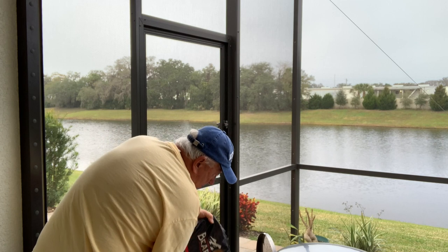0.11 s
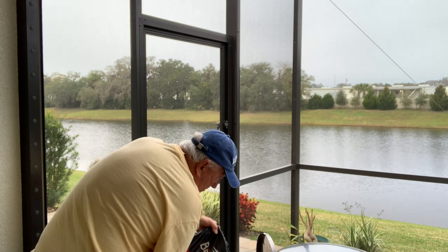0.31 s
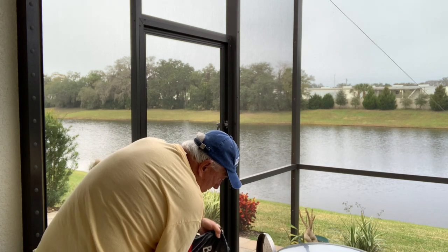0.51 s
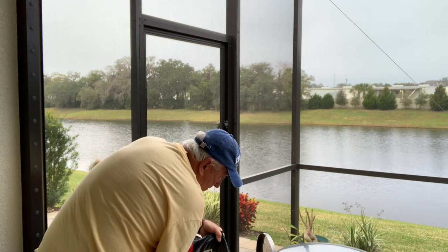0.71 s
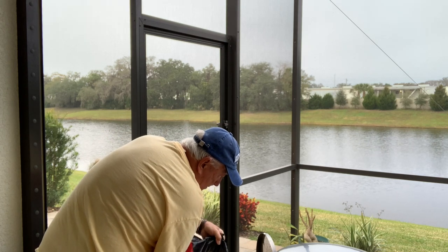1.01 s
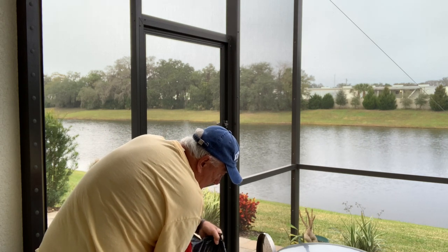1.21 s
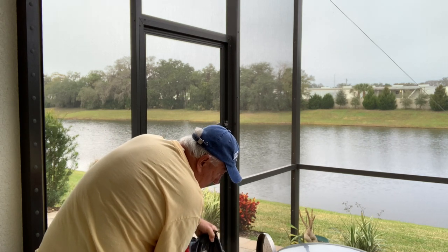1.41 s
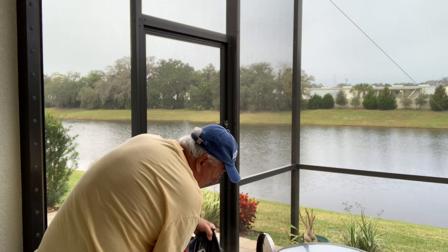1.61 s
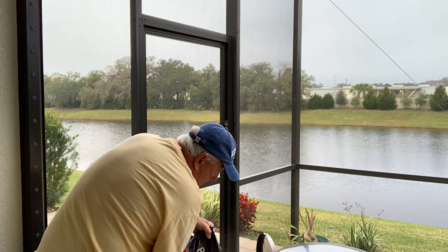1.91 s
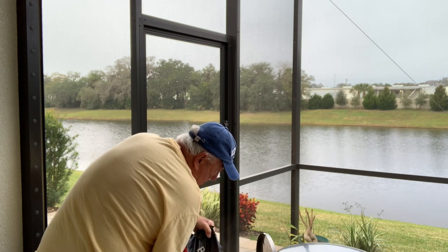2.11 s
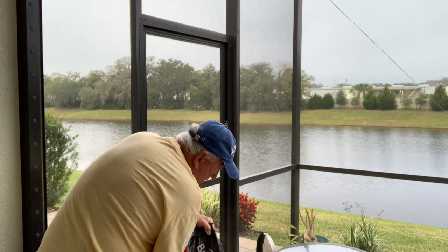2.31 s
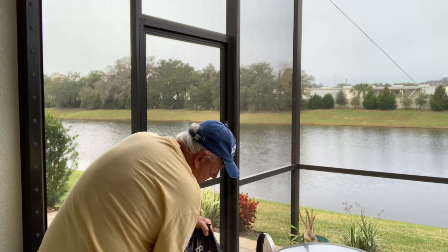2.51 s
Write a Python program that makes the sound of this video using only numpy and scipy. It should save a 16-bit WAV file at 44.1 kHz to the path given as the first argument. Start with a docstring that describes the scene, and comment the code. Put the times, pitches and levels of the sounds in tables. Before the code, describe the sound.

Wood pellets pour into a steel grill hopper, first pinging on bare metal, swelling to a bright dense clatter, then dulling and thinning while the plastic bag crinkles sharply; close stereo microphone on a screened porch, faint outdoor rumble.

```python
"""Wood pellets pour from a plastic bag into the steel hopper of a grill, on a screened porch.
The first ones ping on bare metal, the stream swells and rings the walls, then dulls to a low drumming.
The flow thins to a trickle, the bag crinkles and is bumped, and a last handful slides out.
Random impacts drive coloured filters and steel resonances; snaps and bumps are bursts of impacts;
decaying noise tails make the porch, and coloured noise the outdoor rumble."""
import sys
import numpy as np
from scipy import signal
from scipy.fft import rfft, irfft, next_fast_len
from scipy.io import wavfile
from scipy.ndimage import map_coordinates

SR = 44100
rng = np.random.default_rng(int(sys.argv[2]) if len(sys.argv) > 2 else 0)


def wav_record(signal):
    """Record a signal, one row per channel, as 16-bit PCM in the file named by sys.argv[1]."""
    frames = np.transpose(np.atleast_2d(signal))
    bounded = np.clip(frames, -1, 1)
    # unit amplitude maps onto the largest positive 16-bit level
    quanta = np.round(bounded * 32767).astype(np.int16)
    wavfile.write(sys.argv[1], SR, quanta)


N = 119070

PELLET_SPREAD_DB = 4.5  # mean of the exponential spread of impact size, before its cap
CLUMP_T60_S = .1


def amp(db):
    """Decibels to gain."""
    return 10 ** (np.asarray(db) / 20)


def unit(x):
    """Scale to rms 1."""
    return x / np.sqrt(np.mean(x ** 2) + 1e-20)


def along(points, hz):
    """Read (Hz, value) points on a log frequency axis."""
    f, v = np.transpose(points)
    return np.interp(np.log(hz + 1), np.log(f + 1), v)


def curves(rows):
    """One value per sample for each column after the time."""
    s, *cols = np.transpose(rows)
    return [np.interp(np.arange(N) / SR, s, c) for c in cols]


def wobble(rate):
    """A smooth random curve, rate knots a second."""
    knots = rng.standard_normal(N // 20)
    return map_coordinates(knots, [np.arange(N) * rate / SR], mode="mirror")


def filtered(x, response):
    """Apply a complex response of frequency to x."""
    size = 2 * next_fast_len(N * 2 // 3)
    spectrum = rfft(x, size) * response(np.fft.rfftfreq(size, 1 / SR))
    return irfft(spectrum, size)[..., :N]


def coloured(x, points):
    """A causal filter through (Hz, dB) points that keeps the power of white input."""
    def response(hz):
        # folding the cepstrum makes the response minimum phase
        cepstrum = irfft(np.log(unit(amp(along(points, hz)))))
        half = len(cepstrum) // 2
        return np.exp(rfft(np.r_[cepstrum[:1], 2 * cepstrum[1:half], np.zeros(half)]))
    return filtered(x, response)


def rung(x, modes):
    """Resonances of alternating sign that together keep the power of white input."""
    def response(f):
        h = 0
        for k, (centre_hz, width_hz, db) in enumerate(modes):
            damping = 1j * f * width_hz
            h = h + (-1) ** k * amp(db) * damping / (centre_hz ** 2 - f * f + damping)
        return h / np.sqrt(np.mean(abs(h) ** 2))
    return filtered(x, response)


def gliding(x, hz, width_hz):
    """A resonance whose centre moves; keeps the power of white input."""
    turn = np.exp(2j * np.pi * np.cumsum(hz) / SR)
    pole = np.exp(-np.pi * width_hz / SR)
    gain = np.sqrt(2 * (1 - pole ** 2))
    return np.real(turn * signal.lfilter([gain], [1, -pole], x / turn))


def impacts(rate, spread_db):
    """Random tiny impacts of rms 1: many weak, a few strong."""
    chance = rate / SR
    size = amp(spread_db * np.minimum(rng.exponential(size=N), 4))
    struck = rng.random(N) < chance
    sign = np.sign(rng.standard_normal(N))
    # weaker where denser: the rate changes the grain, not the level
    return unit(struck * sign * size / np.sqrt(chance))


def bursts(rows, t60_s):
    """Envelope of events that rise fast and die away, summed in power."""
    attack_s = .0012
    t = np.arange(N) / SR
    power = np.zeros(N)
    for s, db in rows:
        age = np.maximum(t - s, 0)
        power += (amp(db - 60 * age / t60_s) * (1 - np.exp(-age / attack_s))) ** 2
    return np.sqrt(power)


def outdoors():
    """A low distant rumble of coloured noise, nearly the same in both channels."""
    # rumble colour: (frequency [Hz], relative level [dB])
    rumble_colour = [(20, -27), (60, -3.5), (115, 2), (170, -5), (350, -3.5), (2000, -13), (4000, -24.5),
                     (15000, -68)]
    level_db, side_db = -35.5, -10.5  # side relative to mid
    mid, side = coloured(rng.standard_normal((2, N)), rumble_colour)
    side = side * amp(side_db)
    return amp(level_db) * np.array([mid + side, mid - side])


def diffuse(channels=3):
    """Unrelated noise tails of energy 1 whose decay time varies with frequency."""
    # porch decay: (frequency [Hz], T60 [s])
    porch_t60 = [(250, .08), (2000, .26), (11000, .5)]
    hz, t, z = signal.stft(rng.standard_normal((channels, SR // 3)), SR, nperseg=256)
    fade = amp(-60 * t / along(porch_t60, hz)[:, None])
    fade = fade / np.linalg.norm(fade, axis=1, keepdims=True)  # equal energy in every band
    tail = signal.istft(z * fade, SR, nperseg=256)[1]
    return tail / np.linalg.norm(tail, axis=1, keepdims=True)


def porch(x, count=14):
    """Shared sound, its channel phase varying with frequency, plus unrelated tails that crossfade."""
    # stereo spread, narrow near 9 kHz and at the top:
    # (frequency [Hz], unrelated over shared sound [dB])
    stereo_spread = [(100, -10), (380, -9), (750, 4), (1700, 0), (7100, 2), (8400, -28), (9700, -28),
                     (10700, -5), (12200, -5), (13000, -32)]
    # phase between the channels, opposed near 9 kHz, equal at the top:
    # (frequency [Hz], phase [rad])
    channel_phase = [(100, 0), (1500, .3), (2600, 1.2), (4000, 1.2), (5700, 2.9), (6900, 4), (7600, 3.8),
                     (8300, np.pi), (10000, np.pi), (11700, 1.4), (12900, 0)]
    shared_tail_db = -6  # echo common to both channels, over the dry sound

    place = np.linspace(0, count - 1, N)
    echo = 0
    for k in range(count):
        share = np.sqrt(np.maximum(1 - abs(place - k), 0))
        echo = echo + signal.oaconvolve((x * share)[None], diffuse(), axes=1)[:, :N]
    shared = (x + amp(shared_tail_db) * echo[0]) / np.hypot(1, amp(shared_tail_db))

    def shared_response(f):
        turn = np.exp(.5j * np.array([[-1], [1]]) * along(channel_phase, f))
        return turn / np.hypot(1, amp(along(stereo_spread, f)))

    def unrelated_response(f):
        ratio = amp(along(stereo_spread, f))
        return ratio / np.hypot(1, ratio)

    return filtered(shared, shared_response) + filtered(echo[1:], unrelated_response)


def bag():
    """Creases snap in short flurries; now and then the bag bumps the rim."""
    # crinkles: (time [s], level [dB])
    crinkles = [(.15, -27.5), (1.222, -8.5), (1.411, -13.5), (1.735, -13.5), (1.821, -15), (1.829, -10),
                (1.86, -30), (1.909, -16), (1.95, -22), (2.119, -19), (2.142, -15), (2.338, -19),
                (2.632, -22.5), (2.688, -11)]
    # dull bumps on the rim: (time [s], level [dB])
    bumps = [(1.894, -25), (2.046, -24), (2.69, -27)]
    # crinkle colour: (frequency [Hz], relative level [dB])
    plastic_colour = [(200, -15), (1000, -5), (3000, -3), (6500, 0), (11000, 0), (15700, -2.5)]
    # bump colour: (frequency [Hz], relative level [dB])
    bump_colour = [(100, -8), (300, -6), (560, 5), (1100, -6), (3000, -9), (12000, -28)]
    rate_per_s, spread_db = 8000, 2.5
    crinkle_t60_s, bump_t60_s = .085, .15
    crinkling = impacts(rate_per_s, spread_db) * bursts(crinkles, crinkle_t60_s)
    bumping = impacts(rate_per_s, spread_db) * bursts(bumps, bump_t60_s)
    return coloured(crinkling, plastic_colour) + coloured(bumping, bump_colour)


def drum(rate, drum_db, heap_db):
    """The hopper's low modes drum; its lowest booms with the weight landing on the heap."""
    # hopper modes: (centre [Hz], width [Hz], relative level [dB])
    hopper_modes = [(308.7, 22, 1.5), (359, 16, 1), (404, 8, -7)]
    boom_hz, boom_width_hz, boom_db = 257.3, 10.8, -8.5  # level over the patter
    drumming = rung(impacts(rate, PELLET_SPREAD_DB) * amp(drum_db), hopper_modes)
    boom_hits = impacts(rate, PELLET_SPREAD_DB) * amp(heap_db + boom_db)
    return drumming + rung(boom_hits, [(boom_hz, boom_width_hz, 0)])


def walls(rate, flutter):
    """Impacts ring the steel walls, which are damped as they are buried."""
    # wall ringing: (time [s], level [dB])
    wall_ring = [(.23, -60), (.27, -26), (.33, -20.5), (.48, -21.5), (.57, -14.5), (.63, -20.5),
                 (.8, -18.5), (.95, -20), (1.1, -34.5), (1.5, -62)]
    # wall modes: (centre [Hz], width [Hz], relative level [dB])
    wall_modes = [(1248, 13, 2), (1455, 14, -4), (1624, 34, 1.5), (1704, 22, -2), (1752, 15, 1),
                  (1792, 13, -2), (2068, 29, -1.5), (2145, 19, 1.5), (2224, 43, 2.5), (2460, 36, -3)]
    wall_db, = curves(wall_ring)
    return rung(impacts(rate, PELLET_SPREAD_DB) * flutter * amp(wall_db), wall_modes)


def grate(rate):
    """The bare guard grate rings under the first pellets, its pitch rising as the stream builds."""
    # grate ringing: (time [s], level [dB])
    grate_ring = [(.203, -62), (.21, -30), (.26, -25), (.3, -20.5), (.385, -20), (.44, -31), (.6, -28),
                  (1, -38), (1.4, -58)]
    # grate pitch: (time [s], centre [Hz])
    grate_pitch = [(.21, 3430), (.35, 3660)]
    width_hz = 120
    grate_db, = curves(grate_ring)
    grate_hz, = curves(grate_pitch)
    return gliding(impacts(rate, PELLET_SPREAD_DB) * amp(grate_db), grate_hz, width_hz)


def heap(rate, flutter, heap_db):
    """Pellets patter dully on the heap, with late clumps knocking on it."""
    # late clumps: (time [s], level [dB])
    knocks = [(1.416, -18), (1.668, -20), (2.296, -23.5), (2.341, -16), (2.386, -30), (2.409, -17)]
    # patter colour: (frequency [Hz], relative level [dB])
    heap_colour = [(150, -22), (300, -27), (500, -5.5), (750, -1.5), (920, -1.5), (1400, -2.5), (2200, -10),
                   (3500, -8.5), (7000, -10.5), (15000, -16)]
    level = np.hypot(flutter * amp(heap_db), bursts(knocks, CLUMP_T60_S))
    return coloured(impacts(rate, PELLET_SPREAD_DB) * level, heap_colour)


def ticks():
    """Single pellets striking each other, rms 1: each rings for a few cycles at a pitch of its own."""
    rate_per_s, middle_hz, range_octaves, t60_cycles = 700, 3300, 1.1, 12
    count = int(rate_per_s * N / SR)
    start = rng.integers(N, size=(count, 1))
    hz = middle_hz * 2 ** (range_octaves * rng.uniform(-0.954, 1, (count, 1)))
    size = amp(PELLET_SPREAD_DB * np.minimum(rng.exponential(size=(count, 1)), 3))
    age = np.arange(SR // 100)  # samples
    cycles = hz * age / SR
    rings = size * np.sin(2 * np.pi * cycles) * amp(-60 * cycles / t60_cycles)
    return unit(np.bincount((start + age).ravel(), rings.ravel(), N)[:N])


def clatter(rate, flutter, clatter_db):
    """Pellet strikes pellet: dense bright impacts and single ticks, swelling where clumps land."""
    # clumps landing together: (time [s], level [dB])
    clumps = [(.209, -14), (.255, -6.5), (.303, -21), (.312, -2), (.486, -1), (.531, 0), (.569, 3),
              (.655, 0), (.691, -5), (.785, -2.5), (.859, -3), (.886, -3), (.959, -2.5), (.98, -15)]
    # clatter colour: (frequency [Hz], relative level [dB])
    clatter_colour = [(200, -21), (700, -9), (1500, -4), (3000, -2.5), (7500, 0), (10500, -1.3),
                      (13000, -4.2), (15700, -7.5)]
    tick_db = -5  # over the dense impacts
    stream = np.hypot(flutter * amp(clatter_db), bursts(clumps, CLUMP_T60_S))
    dense = coloured(impacts(rate, PELLET_SPREAD_DB) * stream, clatter_colour)
    return (dense + amp(tick_db) * ticks() * stream) / np.hypot(1, amp(tick_db))


def pellets():
    """The uneven stream clatters and ticks, patters on the heap and rings grate, walls and hopper."""
    # stream: (time [s], pellet-on-pellet clatter [dB], heap patter [dB], hopper drumming [dB])
    pour = [(0, -52.5, -30.5, -34.5), (.2, -32.5, -39, -48), (.22, -28, -43.5, -29.5),
            (.26, -19, -30.5, -30), (.33, -17, -36, -30.5), (.44, -15.5, -27.5, -36),
            (.56, -15.5, -22.5, -25.5), (.61, -13.5, -20, -25.5), (.635, -11.5, -18, -23),
            (.67, -12.5, -31, -25), (.75, -10.5, -19.5, -18), (.81, -11.5, -15, -22.5),
            (.95, -15, -14.5, -18), (1.1, -19.5, -22, -24), (1.42, -25, -26, -32), (1.52, -26, -28.5, -35),
            (1.8, -31.5, -35.5, -40), (2.08, -31.5, -33, -34), (2.16, -30.5, -34, -39),
            (2.325, -27, -33.5, -31.5), (2.35, -22.5, -37, -41.5), (2.44, -24.5, -30.5, -38),
            (2.6, -34, -54, -43.5)]
    trickle_rate_per_s, added_rate_per_s = 3500, 7000  # the second is added in full at the loudest
    flutter_knots_per_s, flutter_db = 70, 1.7
    low_cut_hz = 230
    clatter_db, heap_db, drum_db = curves(pour)
    rate = trickle_rate_per_s + added_rate_per_s * amp(clatter_db - clatter_db.max())
    flutter = amp(flutter_db * wobble(flutter_knots_per_s))
    steel = drum(rate, drum_db, heap_db) + walls(rate, flutter) + grate(rate)
    grains = heap(rate, flutter, heap_db) + clatter(rate, flutter, clatter_db)
    no_bass = signal.butter(6, low_cut_hz, "high", fs=SR, output="sos")
    return signal.sosfilt(no_bass, steel + grains)


def scene():
    """Pellets and bag on the porch, over the outdoor rumble."""
    return porch(pellets() + bag()) + outdoors()


def record(dry):
    """The recorder rounds the highest peaks and keeps nothing above its band limit."""
    ceiling, top_hz = .97, 15730  # ceiling relative to full scale
    rounded = dry / (1 + (dry / ceiling) ** 6) ** (1 / 6)
    return filtered(rounded, lambda hz: hz < top_hz)


dry = scene()
out = record(dry)
wav_record(out)
```